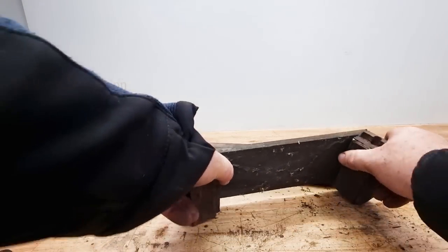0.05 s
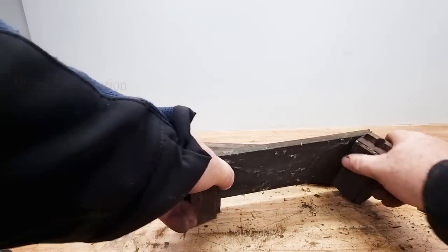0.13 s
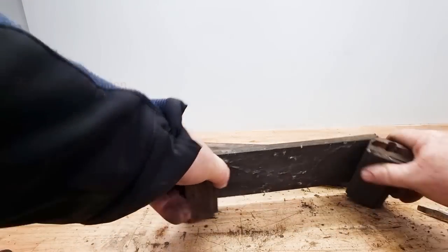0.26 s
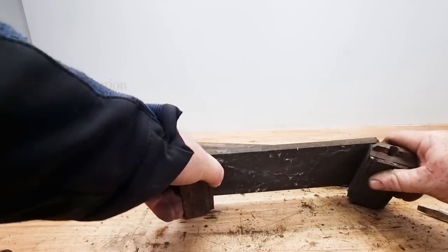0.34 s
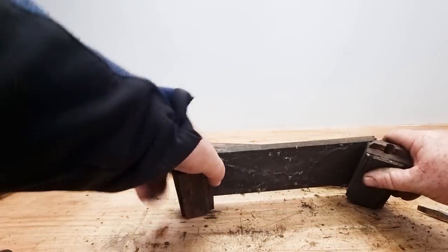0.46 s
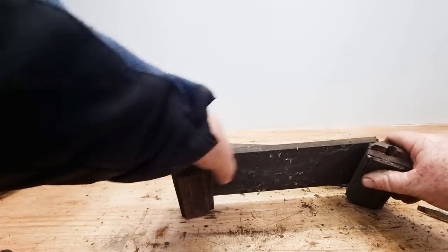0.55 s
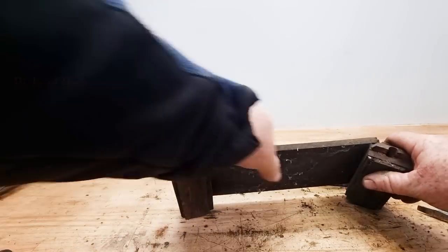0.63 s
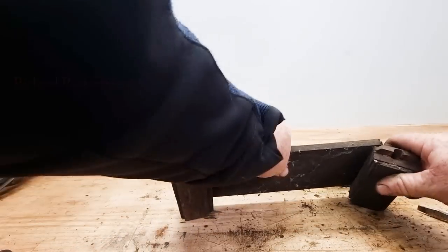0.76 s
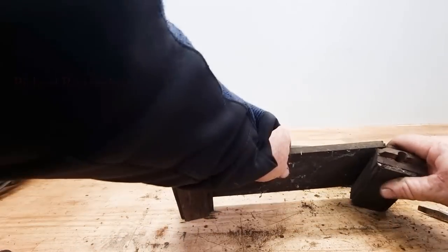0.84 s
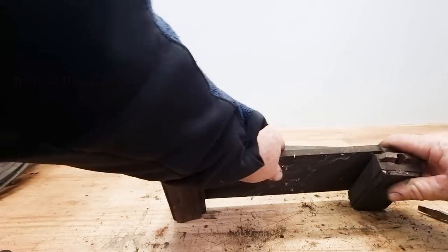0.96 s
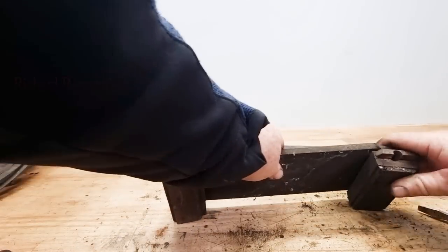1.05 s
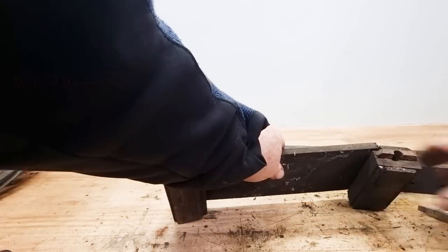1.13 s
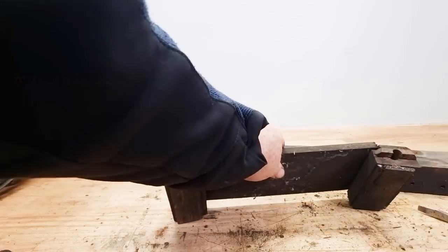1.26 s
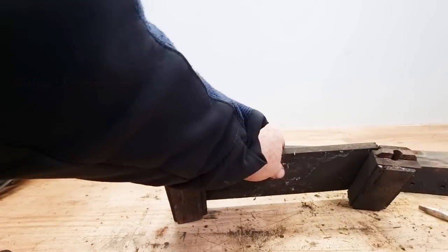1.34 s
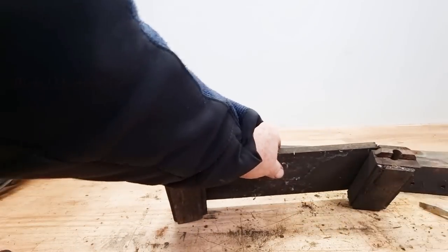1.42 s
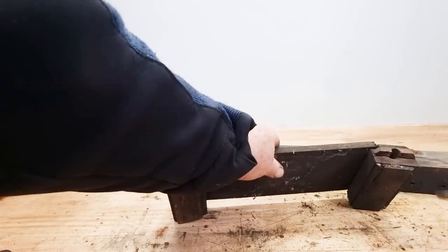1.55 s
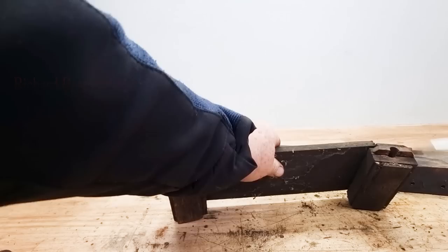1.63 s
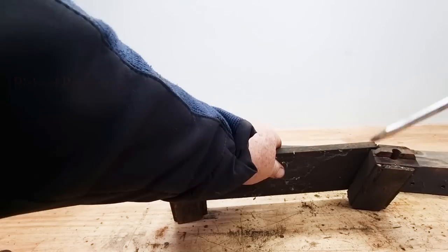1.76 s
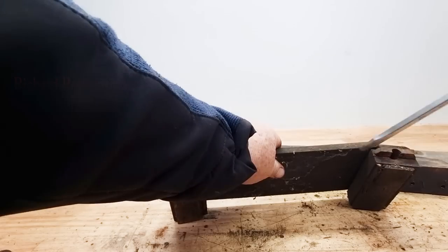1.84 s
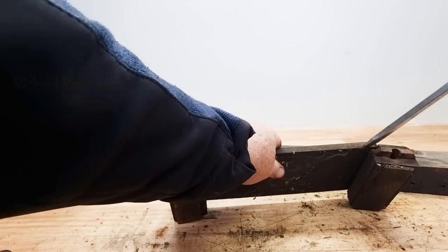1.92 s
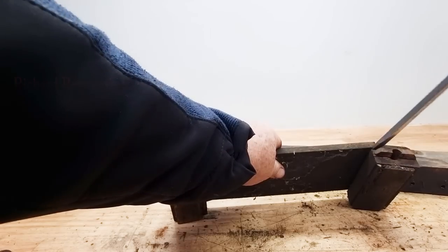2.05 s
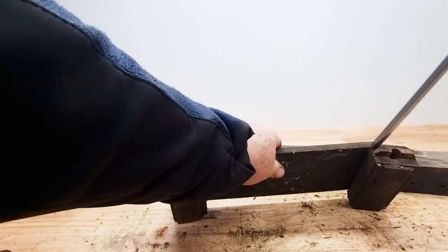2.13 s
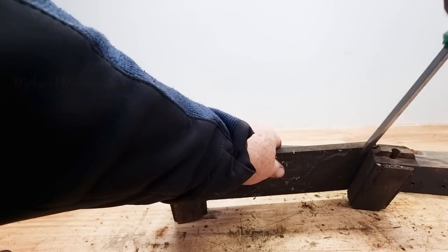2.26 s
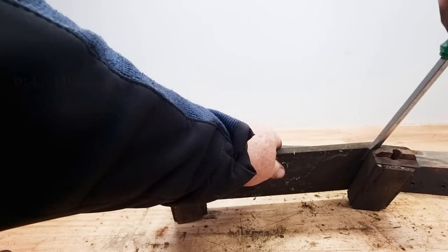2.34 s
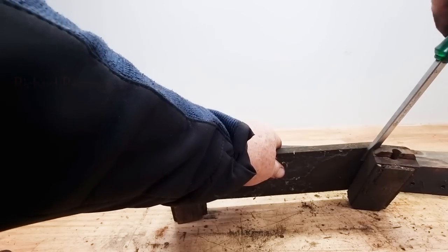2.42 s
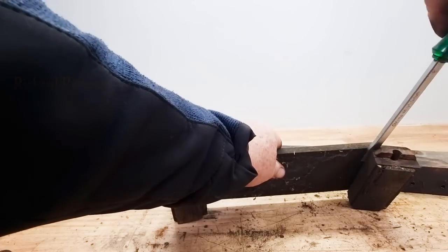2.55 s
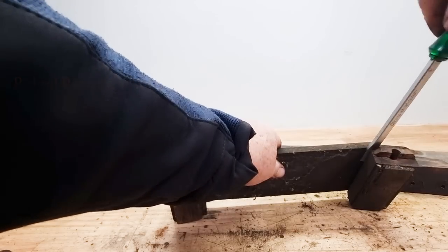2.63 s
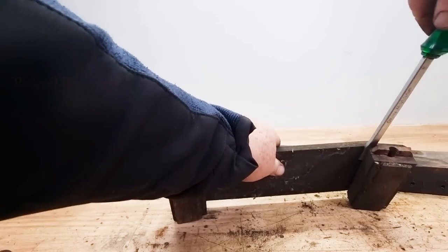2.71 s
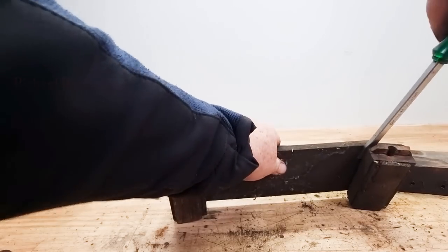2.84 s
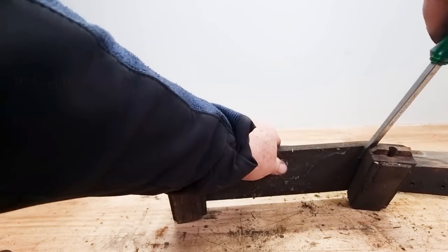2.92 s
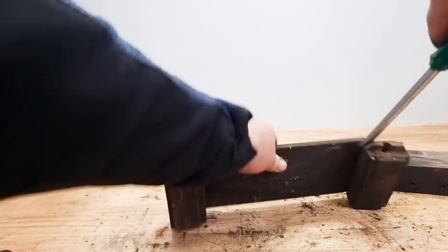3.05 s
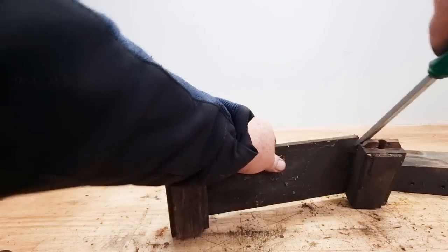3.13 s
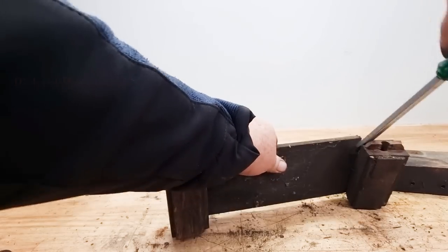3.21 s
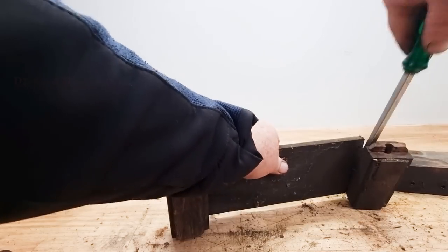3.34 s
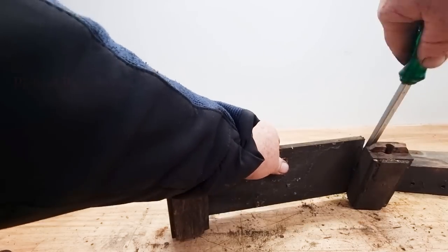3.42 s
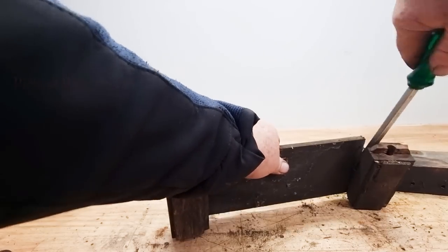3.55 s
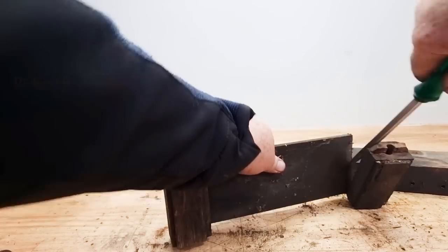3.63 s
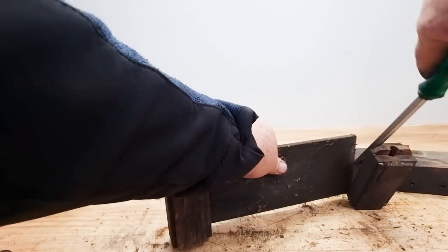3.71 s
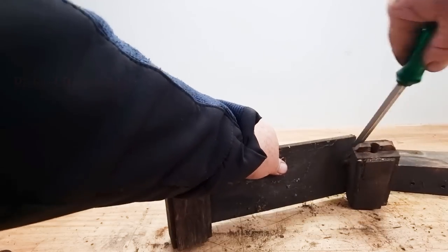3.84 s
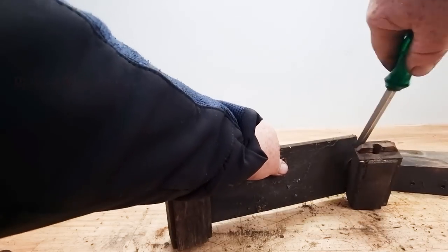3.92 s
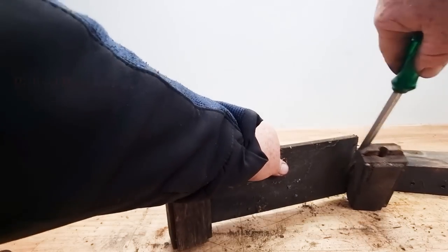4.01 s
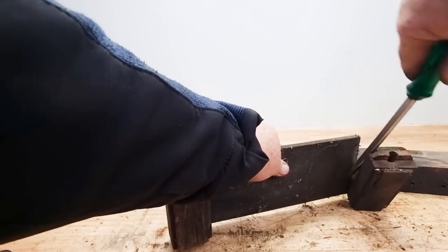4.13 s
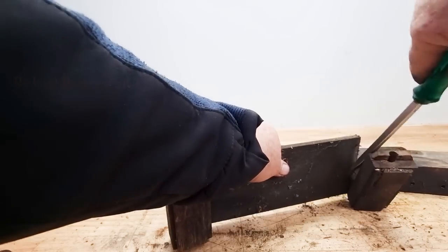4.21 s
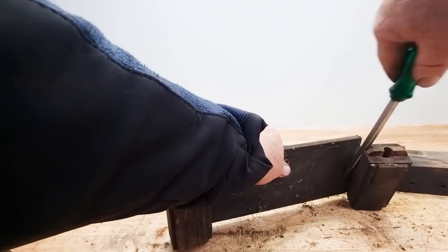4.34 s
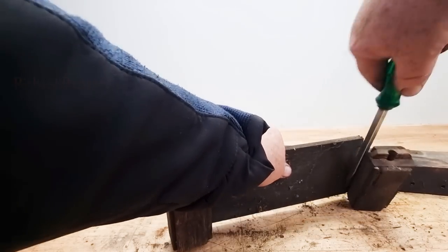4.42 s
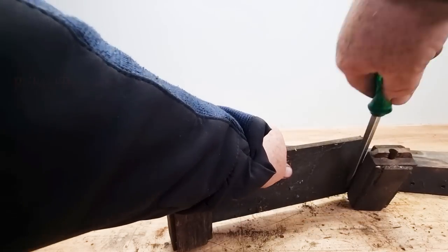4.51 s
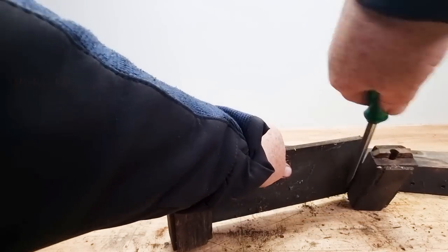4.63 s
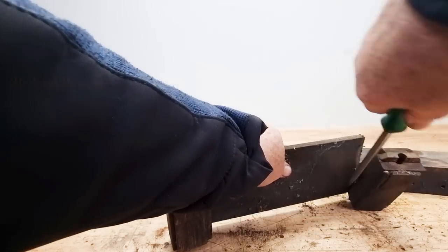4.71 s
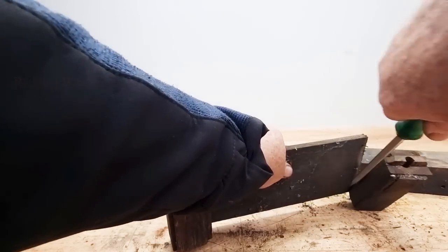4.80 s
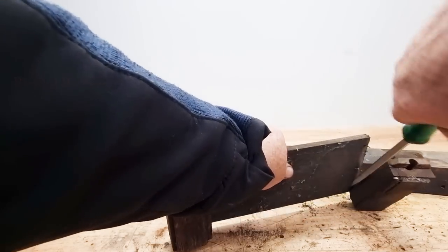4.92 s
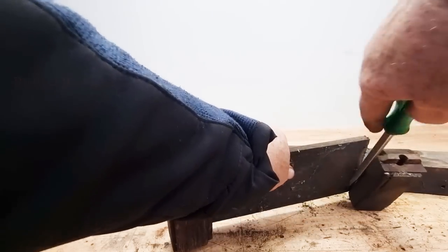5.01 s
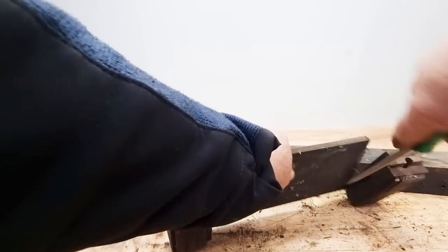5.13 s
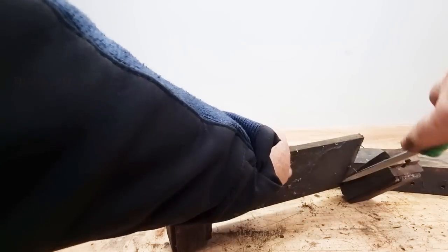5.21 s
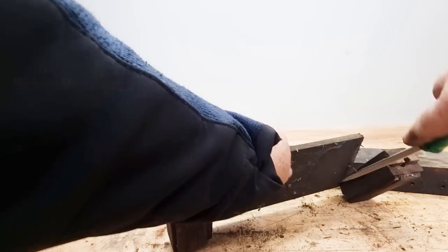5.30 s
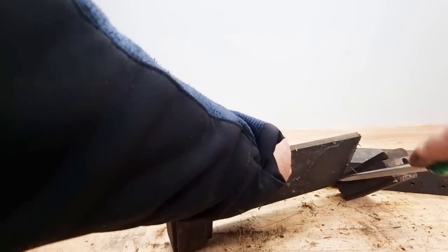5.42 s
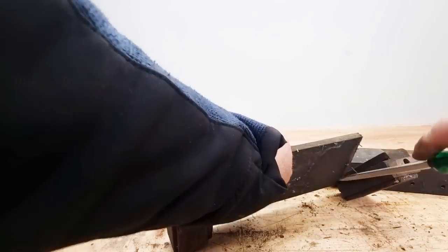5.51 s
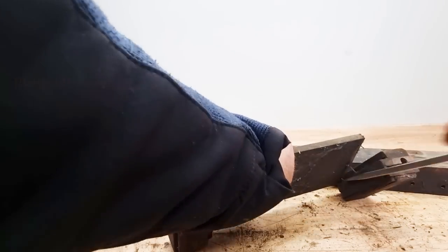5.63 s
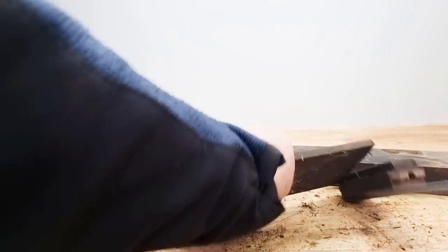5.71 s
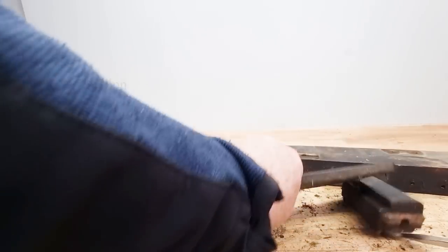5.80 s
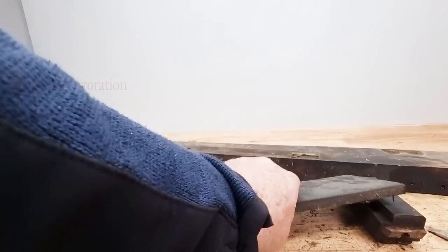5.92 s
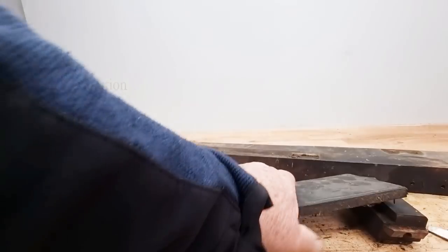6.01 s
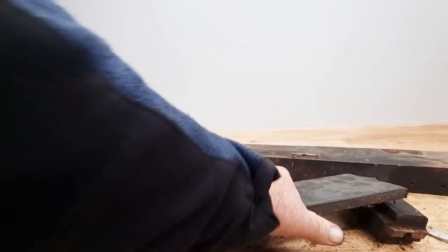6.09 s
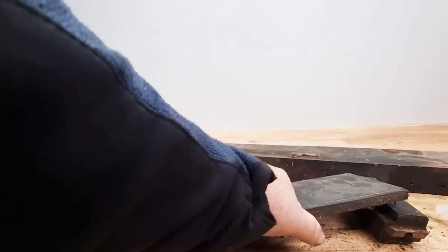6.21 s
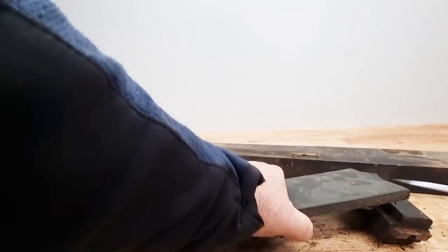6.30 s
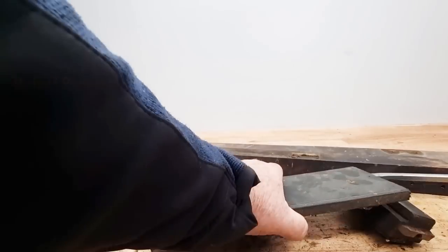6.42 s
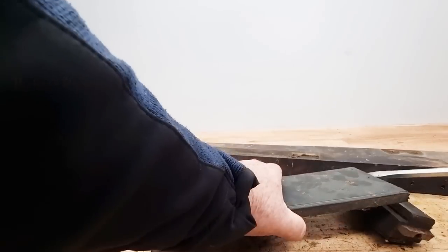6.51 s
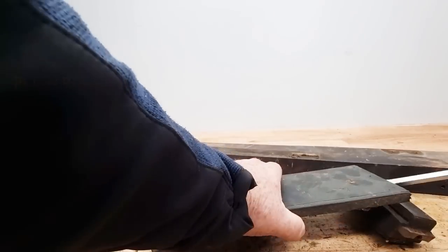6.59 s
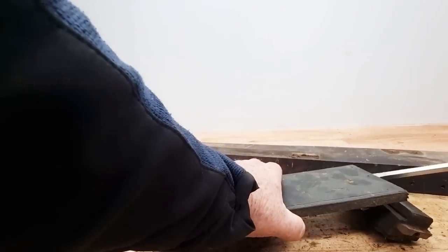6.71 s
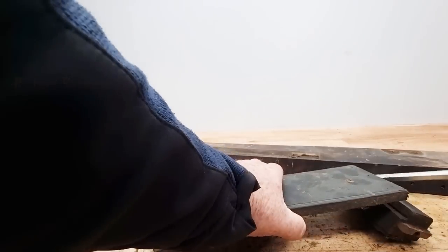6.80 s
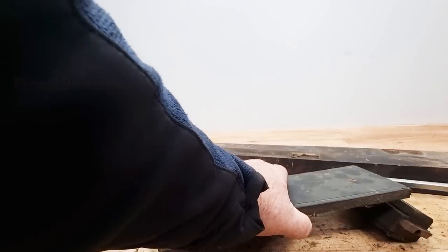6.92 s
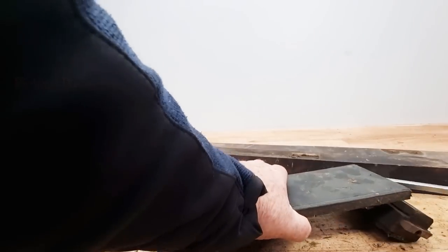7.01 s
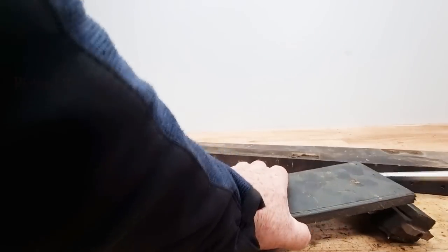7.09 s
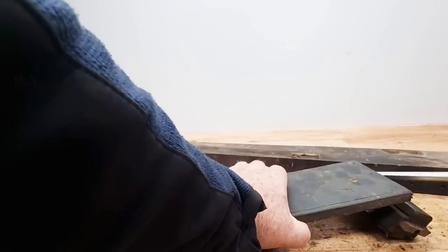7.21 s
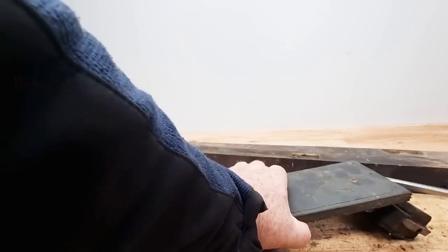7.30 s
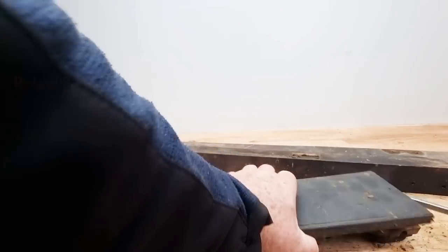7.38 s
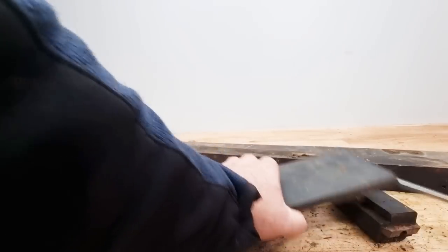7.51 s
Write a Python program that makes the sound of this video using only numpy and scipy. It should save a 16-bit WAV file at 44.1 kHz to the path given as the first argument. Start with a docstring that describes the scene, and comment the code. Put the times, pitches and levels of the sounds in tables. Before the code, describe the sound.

In a small workshop, a steel screwdriver levers dry wood apart with creaks, paint snaps, hollow block clacks and dull bench thumps.

```python
"""Wood groans as it is rubbed and an old timber frame knocks on a workbench, from the start and throughout.
In between, a screwdriver clicks and slips, paint and fibres snap and blocks clack; late on, the blade judders.
Each contact is a short burst of noise that rings wood or steel; rubbing is a stream of tiny slips.
A small workshop answers with echoes, over room noise and a low hum made of narrow bands of noise."""
import sys
import numpy as np
from scipy import signal
from scipy.fft import rfft, irfft, next_fast_len
from scipy.io import wavfile
from scipy.ndimage import map_coordinates

SR = 44100
rng = np.random.default_rng(int(sys.argv[2]) if len(sys.argv) > 2 else 0)


def transcribe(u):
    """Save the signal u as a 16-bit wav file named by the first command-line argument.

    u: samples, shape (n,) or (channels, n), limited to [-1, 1]; the rate is SR.
    q: integer samples, one column per channel.
    """
    v = np.clip(np.atleast_2d(u).T, -1, 1)
    q = np.round(v * 32767).astype(np.int16)
    wavfile.write(sys.argv[1], SR, q)


N = 332955

# In the event tables, level/dB is that of the first 30 ms, and drag/s is how long the surfaces rub.
# slow swells of the background: t/s, hum level before its trim/dB, distant rush level/dB
BACKGROUND_SWELL = [(0, -68.5, -67), (1.8, -81, -67.5), (2.9, -68, -65), (3.9, -60, -60.5),
                    (4.7, -59.5, -59.5), (5.3, -63.5, -62), (6.5, -65.5, -63), (7.55, -67, -62)]
# bands of the hum: f/Hz, relative level/dB
HUM_BANDS = [(64, -11), (94, 2), (157, -4)]
# tone colour of the room noise: f/Hz, relative level/dB
AIR_COLOUR = [(12, -66), (20, -35), (55, -3.5), (127, 2.5), (241, -1.5), (293, -10.5), (499, -5),
              (574, -13), (738, -11), (1190, -12.5), (1440, -16), (2200, -20), (3250, -30), (6910, -34.5),
              (11500, -32.5), (13000, -46), (16000, -38)]
# how alike the room noise is on left and right: f/Hz, likeness (1 = the same)
AIR_ALIKE = [(150, .999), (400, 0.99), (1200, 0.92), (2800, 0.5), (6000, 0.071)]
# how alike the echo is on left and right: f/Hz, likeness (1 = the same)
ECHO_ALIKE = [(120, 0.99), (300, 1), (1200, 0.82), (2800, 0.65), (5000, 0.37), (12000, 0.33)]
# how fast the echo dies, before the early echoes are raised: f/Hz, time to fall by 60 dB/s
ECHO_DECAY = [(150, 0.29), (400, 0.35), (1000, 0.37), (3000, 0.39), (8000, 0.39), (15000, 0.25)]
# balance of the two sides: f/Hz, left minus right/dB
SIDE_BALANCE = [(1300, -0.05), (2800, -3.5), (5500, -6), (12000, -5.5)]
# resonances of frame and bench: f/Hz, width/Hz, relative level/dB
TIMBER_MODES = [(197, 31, 10), (241.4, 19.5, 5.5), (299, 62, -14.5), (344.6, 51, 1.5), (417.6, 20, 3),
                (478, 60, -1), (656, 290, -11), (802, 55, -7.5), (980, 86, -11), (1170, 280, -10),
                (1335, 160, -6), (1530, 80, -16), (2210, 780, -7.5)]
# a firmly held piece is bumped: t/s, level/dB, note f/Hz, drag/s
THUMPS = [(0.059, -37.5, 236, 0.0064), (0.219, -48.5, 241, 0.0053), (0.631, -53.5, 332, 0.01),
          (1.934, -54, 520, 0.0025), (2.012, -50.5, 480, .014), (3.39, -36.5, 393, 0.0029),
          (4.379, -50, 215, .025), (4.775, -46.5, 189, 0.0047), (4.788, -39, 204, 0.015),
          (5.374, -43, 223, 0.015), (5.421, -42, 225, 0.0093), (5.438, -38.5, 247, 0.0034),
          (5.563, -47, 196, 0.0033), (5.589, -42, 228, 0.018)]
# the frame drops or rocks on the bench: t/s, level/dB, contact hardness f/Hz, drag/s
KNOCKS = [(0.056, -39.5, 403, 0.003), (0.257, -50, 300, 0.025), (1.062, -57, 244, 0.025),
          (1.397, -55.5, 630, 0.024), (2.009, -47.5, 450, 0.026), (2.057, -48, 336, 0.019),
          (2.241, -46.5, 405, 0.0095), (2.413, -53.5, 420, 0.0042), (2.594, -46, 540, 0.026),
          (2.629, -41.5, 440, 0.0089), (2.832, -57.5, 400, 0.0074), (3.047, -46, 596, 0.011),
          (3.389, -36.5, 710, 0.01), (3.599, -42.5, 700, 0.02), (4.349, -48.5, 490, 0.0045),
          (4.51, -54, 530, 0.0028), (5.138, -41, 407, 0.026), (5.163, -42.5, 416, 0.017),
          (5.438, -41.5, 520, 0.0068), (5.872, -36, 610, 0.014), (6.027, -40, 540, 0.022),
          (7.341, -34.5, 1420, 0.027), (7.363, -34.5, 1300, 0.029), (7.393, -40.5, 736, 0.029)]
# strokes of sliding or levering, levels at the peak of pressure before the echo is added:
# start t/s, length/s, groan level/dB, contact hardness f/Hz, paint grit level/dB
RUBS = [(0, 0.13, -47.5, 583, -64), (0.228, 0.095, -48, 480, -74.5), (0.706, 0.057, -59, 318, -60),
        (0.79, 0.39, -66.5, 475, -74), (1.137, 0.53, -64.5, 617, -73), (2.022, 0.056, -47.5, 430, -65),
        (2.264, 0.097, -51, 254, -71), (2.471, 0.27, -47.5, 750, -65), (3.191, 0.37, -51, 730, -65),
        (3.856, 0.094, -50, 381, -65.5), (4.009, 0.047, -52.5, 400, -66), (4.318, 0.11, -52, 400, -67),
        (5.366, 0.12, -60, 500, -55), (5.668, 0.13, -41.5, 226, -61), (5.796, 0.14, -41, 446, -60),
        (5.92, 0.52, -61.5, 510, -70), (6.499, 0.21, -56, 260, -75), (7.094, 0.081, -53, 417, -68)]
# tone colour of crumbling paint: f/Hz, relative level/dB
FLAKE_COLOUR = [(800, 21.5), (2500, 18), (4000, -3), (5500, 7.5), (8000, 4), (12000, 0), (16000, 1)]
# block against block: t/s, level/dB, pitch f/Hz, drag/s, bench thud compared with the clack/dB
CLACKS = [(1.394, -56.5, 1300, 0.011, -5), (3.048, -41, 547, 0.012, -2.5),
          (3.056, -41.5, 920, 0.0034, -0.5), (3.389, -39, 850, 0.0044, -4), (3.745, -54.5, 1310, 0.013, -2),
          (4.68, -60, 790, 0.0046, -2), (5.598, -54.5, 1120, .002, 2), (5.8, -37, 1390, 0.0027, 0.5),
          (5.84, -40.5, 1380, .0014, -5), (5.868, -43, 1240, 0.013, 1), (5.89, -50.5, 1350, 0.0017, 0),
          (6.029, -44.5, 1090, 0.00086, 0), (6.094, -43.5, 1350, 0.0021, -2.5),
          (6.11, -49.5, 1300, 0.0042, -5.5), (7.339, -36, 886, 0.0078, -2),
          (7.34, -37.5, 1570, 0.033, -1.5), (7.378, -41, 1120, 0.0091, -10)]
# paint and fibres break: t/s, level/dB, splinter f/Hz, its width/Hz, splinter ring/dB, tearing time/s
SNAPS = [(0.254, -69.5, 4930, 2000, 17, 0.0044), (0.789, -68.5, 7000, 900, 29, 0.0052),
         (1.0444, -49.5, 7800, 2210, 18, 0.012), (1.506, -64.5, 4500, 600, -27, 0.0055),
         (3.049, -56, 2930, 3000, 21, 0.03), (3.081, -46.5, 8550, 500, 26, 0.0072),
         (3.513, -60, 8950, 1130, 32, 0.003), (3.593, -57.5, 7100, 900, -14, 0.0044),
         (4.556, -63, 9900, 1300, -3, .0034), (4.678, -54, 10800, 4000, -4, 0.0044),
         (4.961, -54, 8100, 4320, 20, 0.0047), (5.131, -45, 5500, 700, -28, 0.0082),
         (5.141, -45.5, 2800, 1500, -12, 0.019), (5.723, -65, 6940, 1600, 23, 0.029),
         (5.802, -55, 3150, 426, 39, 0.0073)]
# tone colour of a crack: f/Hz, relative level/dB
CRACK_COLOUR = [(300, 4), (1000, 12.5), (2500, 7), (4000, 2), (9000, -2.5), (15000, 0)]
# Resonances of the screwdriver shaft, in five ways of holding it; each contact retunes them.
# only the tip touches: f/Hz, width/Hz, relative level/dB
FREE = [(2530, 170, 12), (3920, 160, 11), (5200, 400, 6), (5650, 200, 6), (7300, 300, 3), (8950, 400, 3)]
# wedged in the joint: f/Hz, width/Hz, relative level/dB
WEDGED = [(1980, 70, 17), (2280, 60, 11), (2560, 110, 11), (2940, 35, 18), (3040, 45, 14), (3480, 70, 8),
          (3780, 50, 12), (3910, 40, 16), (4850, 50, 12), (5600, 60, 9)]
# laid against a board: f/Hz, width/Hz, relative level/dB
LAID = [(2310, 110, 15), (2670, 130, 8), (3830, 100, 2), (4380, 200, 3), (6780, 250, 8)]
# pressed flat in the opened joint: f/Hz, width/Hz, relative level/dB
PRESSED = [(2590, 130, 15), (3730, 120, 10), (5280, 140, 11)]
# edge dragged lightly: f/Hz, width/Hz, relative level/dB
SQUEAK = [(2000, 120, 6), (3980, 160, 12)]
# screwdriver contacts: t/s, level/dB, brightest f/Hz, shaft resonances,
# where the first listed resonance is tuned f/Hz, ring/dB, drag/s
TIP_CONTACTS = [(0.715, -78.5, 3400, SQUEAK, 1980, 18, 0.025), (0.86, -77.5, 3880, SQUEAK, 1990, 20, 0.023),
                (1.014, -71, 4000, SQUEAK, 2000, 20, 0.017), (1.045, -59, 2620, WEDGED, 1960, -4, 0.005),
                (1.932, -46.5, 1860, FREE, 2500, 0, 0.0026), (1.936, -48, 2470, FREE, 2560, 4, 0.0088),
                (2.004, -63, 5500, FREE, 2490, 5, 0.0095), (2.01, -57, 4480, FREE, 2470, -6, 0.0086),
                (2.273, -59, 2520, FREE, 2570, 20, 0.0083), (2.309, -62.5, 6700, FREE, 2600, -1, 0.0079),
                (2.343, -63.5, 3300, FREE, 2540, -1, 0.013), (2.612, -64, 3900, SQUEAK, 1950, 10, 0.021),
                (3.213, -57, 3200, WEDGED, 1930, -8, 0.01), (3.236, -55, 2800, WEDGED, 2000, -7, 0.0086),
                (3.28, -46, 1330, WEDGED, 2040, -15, 0.0078), (3.306, -45, 2070, WEDGED, 1974, -2, 0.0074),
                (3.312, -42.5, 2760, WEDGED, 1984, -4, 0.014),
                (3.342, -54.5, 2580, WEDGED, 1960, -3, 0.011), (3.444, -41, 3150, WEDGED, 1938, -6, 0.0084),
                (3.45, -44, 2840, WEDGED, 1997, -8, 0.021), (3.59, -53, 3050, WEDGED, 1940, -14, 0.02),
                (3.74, -57, 2900, FREE, 2560, 5, 0.012), (5.439, -59.5, 3150, PRESSED, 2530, 24, 0.0038),
                (5.598, -49, 1490, LAID, 2290, -1, 0.0052), (6.349, -59, 1630, LAID, 2310, -7, 0.026),
                (6.638, -56, 2660, LAID, 2310, -1, 0.0098), (7.356, -46, 2060, LAID, 2280, 16, 0.0075),
                (7.391, -44, 2530, LAID, 2370, -5, 0.011)]

HUM_WIDTH_HZ, HUM_TRIM_DB = 16, -2.5
RUMBLE_DB, HISS_DB = -64.0, -86.0
# the pressure peaks at this share of a stroke and is lower at both ends; faint grit never stops
RUB_PEAK, GROAN_SWELL_DB, GRIT_SWELL_DB, RESTING_GRIT_DB = 0.53, 9.5, 8, -99.5
BLADE_RING_DB = 19  # crumbling paint rings the blade
# each clack passes into the bench a moment later, as a duller thud
THUD_DELAY_S, THUD_HARD_HZ, THUD_DRAG_S = 0.00536, 423, 0.012
# judder: the slips grow stronger and come ever more slowly
JUDDER_START_S, JUDDER_S, JUDDER_RISE_S, JUDDER_DB = 7.237, 0.037, 0.0039, -37
FIRST_SLIPS_PER_S, LAST_SLIPS_PER_S = 215, 133
RASP_DB, BOARD_DB = -12.5, -5  # compared with the chirps
# the blade jolts the wood: level under a contact of JOLT_REF_DB, dB gained per dB of contact, hardness
JOLT_REF_DB, JOLT_DB, JOLT_GROWS, JOLT_HARD_HZ = -55, -55, 0.43, 890
# the grip shifts from contact to contact: typical change of pitch (share of it) and of level
GRIP_DETUNE, GRIP_DB = 0.004, 1.5
LEFT_LEAD_S = 2.3e-5  # the work arrives this much earlier on the left
TOP_HZ = 15850


def amp(db):
    """Turn decibels into a gain."""
    return 10 ** (np.asarray(db) / 20)


def unit(x):
    """Scale a sound to an average (rms) level of 1."""
    return x / np.sqrt(np.mean(x ** 2) + 1e-20)


def along(points, hz):
    """Read a value between (f, value) points, with frequency on a log scale."""
    f, v = np.transpose(points)
    return np.interp(np.log(hz + 1), np.log(f + 1), v)


def curves(rows):
    """Draw one curve over the whole scene for each column after the time."""
    s, *cols = np.transpose(rows)
    return [np.interp(np.arange(N) / SR, s, c) for c in cols]


def wobble(rate):
    """Make a smooth random curve with rate random points a second."""
    knots = rng.standard_normal(int(N * rate / SR) + 4)
    return map_coordinates(knots, [np.arange(N) * rate / SR])


def filtered(x, response):
    """Shape a sound by a response that depends on frequency."""
    n = x.shape[-1]
    m = next_fast_len(n + SR // 4)  # spare room for the ringing
    return irfft(rfft(x, m) * response(np.fft.rfftfreq(m, 1 / SR)), m)[..., :n]


def resonance(f, hz, width):
    """One damped resonance, with gain 1 at its centre."""
    return 1j * f * width / (hz * hz - f * f + 1j * f * width)


def add(track, s, sound):
    """Mix a sound into a track at time s."""
    part = track[:, max(round(s * SR), 0):][:, :sound.shape[-1]]
    part += sound[:, :part.shape[-1]]


def diffuse(n, alike):
    """White noise from all sides: a shared part and an opposed part set how alike left and right are."""
    turn = lambda f: np.arccos(np.clip(along(alike, f), -1, 1)) / 2
    shares = lambda f: np.array([np.cos(turn(f)), np.sin(turn(f))])
    mid, side = filtered(rng.standard_normal((2, n)), shares)
    return np.array([mid + side, mid - side])


def echo(rise_s, early=1.0, early_s=0.0099):
    """The workshop's answer: fading noise that builds up over rise_s, strong early from bench and wall."""
    hz, t, z = signal.stft(diffuse(SR // 2, ECHO_ALIKE), SR, nperseg=256)
    fading = amp(-60 * t / along(ECHO_DECAY, hz)[:, None])
    tail = signal.istft(z * fading, SR, nperseg=256)[1]
    t = np.arange(tail.shape[1]) / SR
    build_up = 1 - np.exp(-(t / rise_s) ** 2)
    tail = tail * build_up * (1 + early * np.exp(-t / early_s))
    return tail / np.linalg.norm(tail[0])  # energy 1 on the left


def in_room(x, wet_db):
    """Add the room's echo to a running sound."""
    answer = signal.fftconvolve(x[None], echo(rise_s=0.0008), axes=1)[:, :len(x)]
    return x + amp(wet_db) * answer


def strike(body, db, drag, wet_db, bite, rough_db=5, carry=3.1):
    """A first contact, then friction for about drag seconds, makes a body and the room ring."""
    room = echo(rise_s=0.36 * drag)  # a longer contact fills the room more slowly
    t = np.arange(room.shape[1]) / SR
    noise, catch = rng.standard_normal((2, len(t)))
    catch = np.interp(t, np.arange(len(t)) / 1000, catch)  # a new random value every millisecond
    pressure = (1 - np.exp(-6 * t / drag)) * np.exp(-(t / drag) ** 4)
    roughness = amp(rough_db * np.clip(catch, -1.5, 1.5))  # the surfaces catch and let go
    force = noise * roughness * pressure
    force = force / np.linalg.norm(force)
    force[0] += bite / (1 + drag / 0.0064)  # taps start sharply, long skids ease in
    force = force / np.linalg.norm(force)
    # the echo keeps part of the contact's colour
    coloured = signal.fftconvolve(force[None], room, axes=1)[:, :len(t)]
    room = room + carry * coloured
    sound = filtered(force + amp(wet_db) * room / np.linalg.norm(room[0]), body)
    first_30_ms = sound.mean(0)[:int(0.03 * SR)]
    return amp(db) * sound / np.std(first_30_ms)


def grains(rate, scatter_db):
    """Random slips of uneven size, on average rate a second."""
    chance, size, sign = rng.random(N), rng.standard_normal(N), rng.choice([-1, 1], N)
    return (chance < rate / SR) * sign * amp(scatter_db * np.clip(size, -2, 2))


def background():
    """Noise split by pitch: steady rumble and hiss, and a distant rush that swells and fades with a hum."""
    hum_db, rush_db = curves(BACKGROUND_SWELL)
    hum = np.zeros(N)
    for hz, db in HUM_BANDS:
        band = filtered(rng.standard_normal(N), lambda f: resonance(f, hz, HUM_WIDTH_HZ) ** 2)
        hum += amp(db) * unit(band)
    air = filtered(diffuse(N, AIR_ALIKE), lambda f: amp(along(AIR_COLOUR, f)))
    rumble = filtered(air, lambda f: 1 / (1 + (f / 400) ** 4))
    hiss = filtered(air, lambda f: 1 / (1 + (3500 / (f + 1)) ** 4))
    rush = amp(rush_db) * unit(air - rumble - hiss)
    steady = amp(RUMBLE_DB) * unit(rumble) + amp(HISS_DB) * unit(hiss)
    return amp(hum_db + HUM_TRIM_DB) * hum + rush + steady


def thumps():
    """A piece held firmly in the hand is bumped: one low note that dies at once."""
    out = np.zeros((2, N))
    for s, db, hz, drag in THUMPS:
        note = lambda f: resonance(f, hz, 0.46 * hz) ** 2
        add(out, s, strike(note, db, drag, wet_db=-5.5, bite=1.2))
    return out


def timber(f, hard_hz, broad_db=-11, steep=1.91, cut_hz=220):
    """The frame's resonances over a broad bed of dense ones; a soft contact reaches only the low ones."""
    modes = sum(amp(db) * resonance(f, hz, width) for hz, width, db in TIMBER_MODES)
    bed = amp(broad_db) * resonance(f, 1900, 5700)
    contact = (1 + 1j * f / hard_hz * 1.16 - (f / hard_hz) ** 2) ** (-steep / 2)
    radiated = (resonance(f, cut_hz, cut_hz) * 1j * f / cut_hz) ** 2  # small pieces radiate little bass
    return (modes + bed) * contact * radiated / (1 + 1j * f / 6000)


def knocks():
    """The frame rocks and drops on the bench, ringing the timber."""
    out = np.zeros((2, N))
    for s, db, hard_hz, drag in KNOCKS:
        add(out, s, strike(lambda f: timber(f, hard_hz), db, drag, wet_db=-1.0, bite=2.27))
    return out


def stroke(size, swell_db):
    """Gain along one stroke: pressure builds to a peak and eases off."""
    share = np.linspace(0, 1, size)
    return amp(np.interp(share, [0, RUB_PEAK, 1], [-swell_db, 0, -swell_db]))


def scraping():
    """Rubbed wood groans in uneven slips, and paint crumbles in clumps under blade and hands."""
    slips = grains(rate=250, scatter_db=4.5)
    blade = lambda f: 1 + amp(BLADE_RING_DB) * resonance(f, 3910, 200)
    flakes = lambda f: amp(along(FLAKE_COLOUR, f)) * blade(f)
    clumps = grains(rate=1200, scatter_db=3.5) * amp(4.5 * wobble(24))
    grit = unit(filtered(clumps, flakes))
    out = amp(RESTING_GRIT_DB) * grit
    t = np.arange(N) / SR
    for s, length, groan_db, hard_hz, grit_db in RUBS:
        on = (t >= s) & (t < s + length)
        groan = unit(filtered(slips[on], lambda f: timber(f, hard_hz)))
        out[on] += amp(groan_db) * stroke(len(groan), GROAN_SWELL_DB) * groan
        out[on] += amp(grit_db) * stroke(len(groan), GRIT_SWELL_DB) * grit[on]
    return in_room(out, wet_db=-3.0)


def clacks():
    """Small blocks meet with one short, hollow note, and the bench thuds under them."""
    out = np.zeros((2, N))
    bench = lambda f: timber(f, THUD_HARD_HZ)
    for s, db, hz, drag, thud_db in CLACKS:
        note = lambda f: resonance(f, hz * 0.93, hz * 0.28) * resonance(f, hz * 1.028, hz * 0.42)
        block = lambda f: note(f) / (1 + 1j * f / 2500)  # wood is too soft for a bright click
        add(out, s, strike(block, db, drag, wet_db=-1.5, bite=2.8))
        thud = strike(bench, db + thud_db, THUD_DRAG_S, wet_db=-2.0, bite=2.05)
        add(out, s + THUD_DELAY_S, thud)
    return out


def snaps():
    """Paint or fibres break: a rough burst of cracking noise rings the splinter it frees."""
    out = np.zeros((2, N))
    for s, db, hz, width, ring_db, drag in SNAPS:
        ringing = lambda f: 1 + amp(ring_db) * resonance(f, hz, width)
        splinter = lambda f: amp(along(CRACK_COLOUR, f)) * ringing(f)
        add(out, s, strike(splinter, db, drag, wet_db=2.5, bite=0.52, carry=0.78))
    return out


def judder():
    """The blade sticks and slips along a board's edge: steel chirps, with a rasp that shakes the board."""
    t = np.arange(N) / SR - JUDDER_START_S
    on = (t > 0) & (t < JUDDER_S)
    rate = np.interp(t, [0, JUDDER_S], [FIRST_SLIPS_PER_S, LAST_SLIPS_PER_S]) * on
    force = 1 - 0.93 * np.exp(-np.abs(t) / JUDDER_RISE_S)
    # one slip each time the running count passes a whole number
    slips = np.diff(np.ceil(np.cumsum(rate) / SR), prepend=0) * force
    fade = np.exp(-np.arange(400) / (0.002 * SR))
    rasp = rng.standard_normal(N) * signal.fftconvolve(slips, fade)[:N]
    steel_tone = lambda f: resonance(f, 2340, 290) * resonance(f, 2660, 430)
    edge_tone = lambda f: resonance(f, 4220, 610) ** 2 + 0.29 * resonance(f, 5040, 1800)
    chirps = unit(filtered(slips, steel_tone))
    edge = unit(filtered(rasp, edge_tone))
    board = unit(filtered(rasp, lambda f: timber(f, hard_hz=1480)))
    sound = in_room(chirps + amp(RASP_DB) * edge + amp(BOARD_DB) * board, wet_db=-2.5)
    return amp(JUDDER_DB) * sound / np.std(sound.mean(0)[on])


def steel(f, bright_hz, modes, ring_db, spread=0.91):
    """The click of the tip, centred on bright_hz, with the shaft's resonances added to it."""
    shaft = sum(amp(db) * resonance(f, hz, width) for hz, width, db in modes)
    click = resonance(f, bright_hz, spread * bright_hz) ** 2 / (1 + 1j * f / 8000)
    return (1 + amp(ring_db) * shaft) * click


def gripped(modes, lowest_hz):
    """Retune the shaft for where the blade is held, with each resonance a little off by chance."""
    chance = rng.standard_normal((len(modes), 2))
    retune = lowest_hz / modes[0][0]
    return [(hz * retune * (1 + GRIP_DETUNE * a), width, db + GRIP_DB * b)
            for (hz, width, db), (a, b) in zip(modes, chance)]


def screwdriver_tip():
    """The blade taps and skids in the joint, ringing its shaft; each contact jolts the timber too."""
    out = np.zeros((2, N))
    wood = lambda f: timber(f, JOLT_HARD_HZ)
    for s, db, hz, modes, lowest_hz, ring_db, drag in TIP_CONTACTS:
        shaft = gripped(modes, lowest_hz)
        blade = lambda f: steel(f, hz, shaft, ring_db)
        add(out, s, strike(blade, db, drag, wet_db=-4.5, bite=0.8))
        jolt_db = JOLT_DB + JOLT_GROWS * (db - JOLT_REF_DB)
        add(out, s, strike(wood, jolt_db, drag, wet_db=-1.0, bite=2.1))
    return out


def scene():
    """The work, a touch earlier on the left, over the background; all treble is stronger on the right."""
    work = thumps() + knocks() + scraping() + clacks() + snaps() + judder() + screwdriver_tip()
    sides = np.array([[0.5], [-0.5]])  # left, right
    work = filtered(work, lambda f: np.exp(2j * np.pi * f * LEFT_LEAD_S * sides))
    return filtered(work + background(), lambda f: amp(sides * along(SIDE_BALANCE, f)))


def record(dry):
    """Cut the sound off very steeply above TOP_HZ."""
    return filtered(dry, lambda f: 1 / (1 + (f / TOP_HZ) ** 120))


dry = scene()
out = record(dry)
transcribe(out)
```